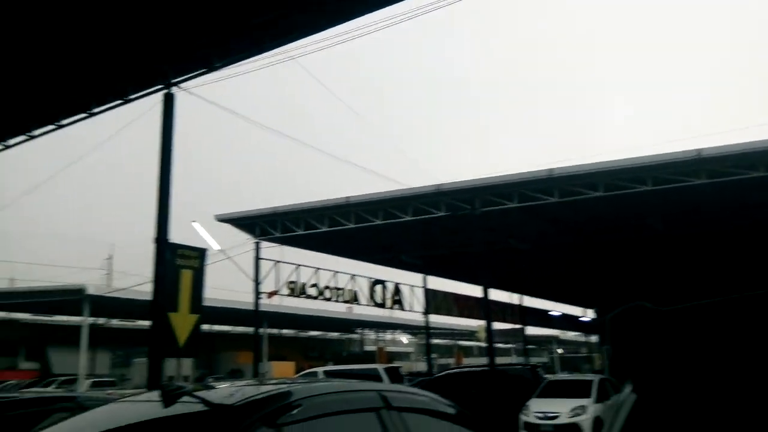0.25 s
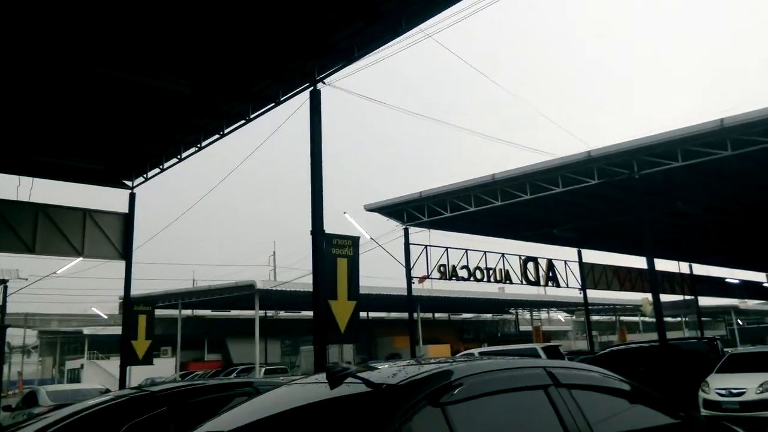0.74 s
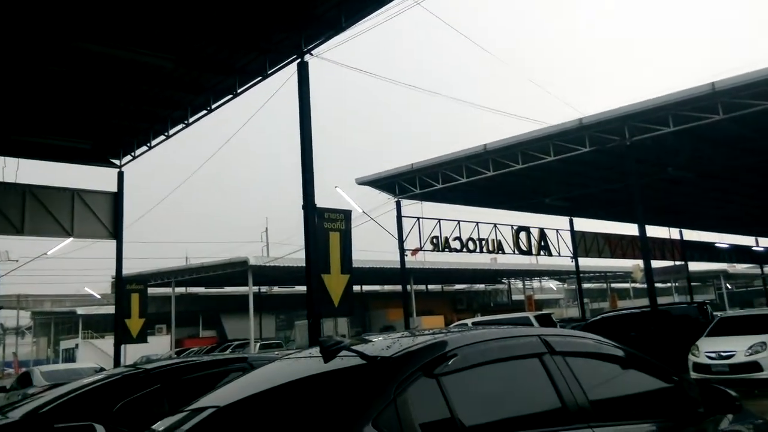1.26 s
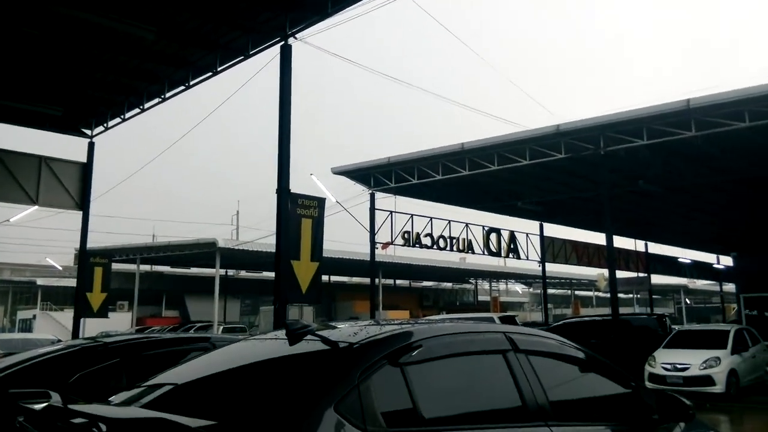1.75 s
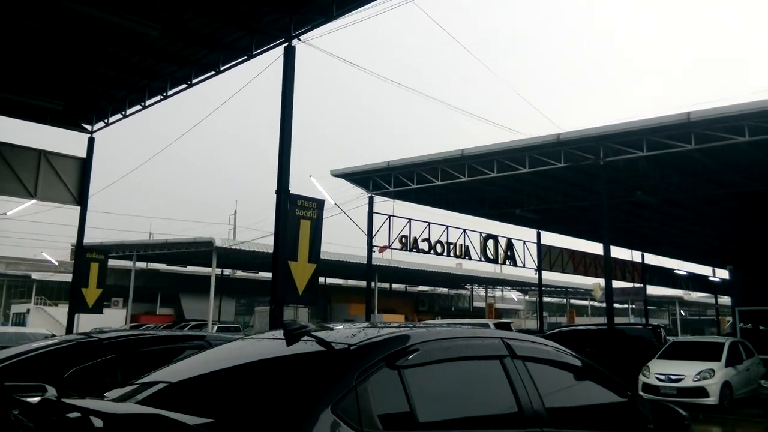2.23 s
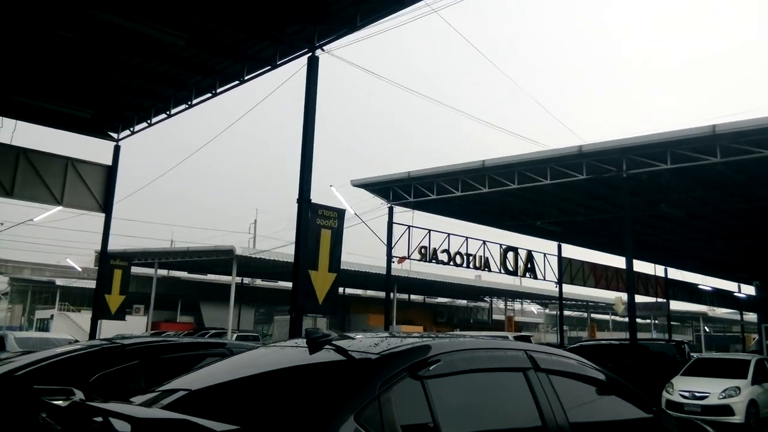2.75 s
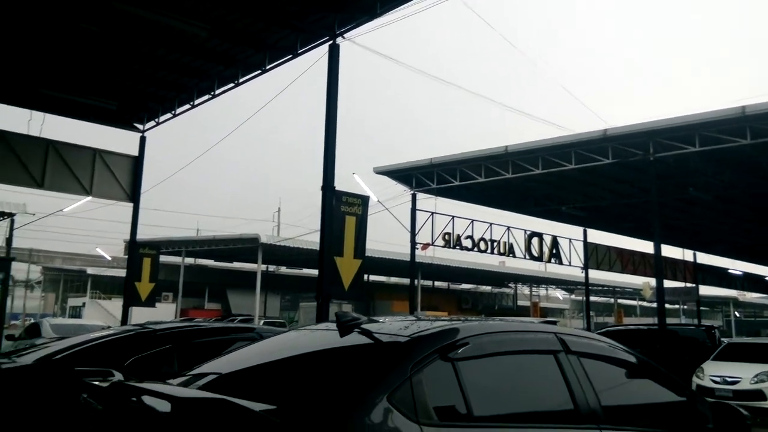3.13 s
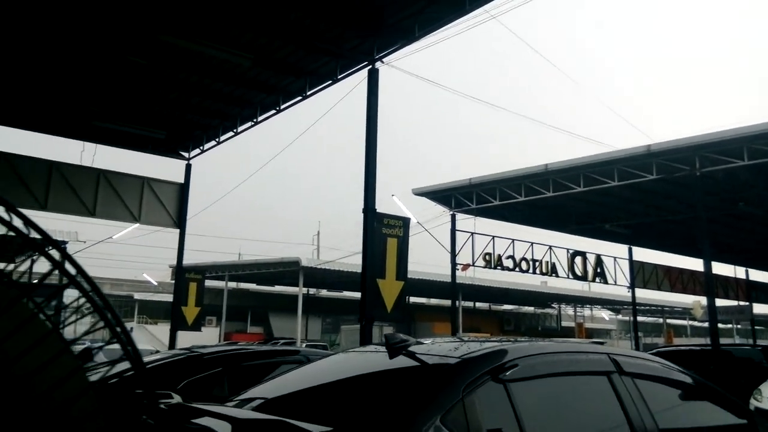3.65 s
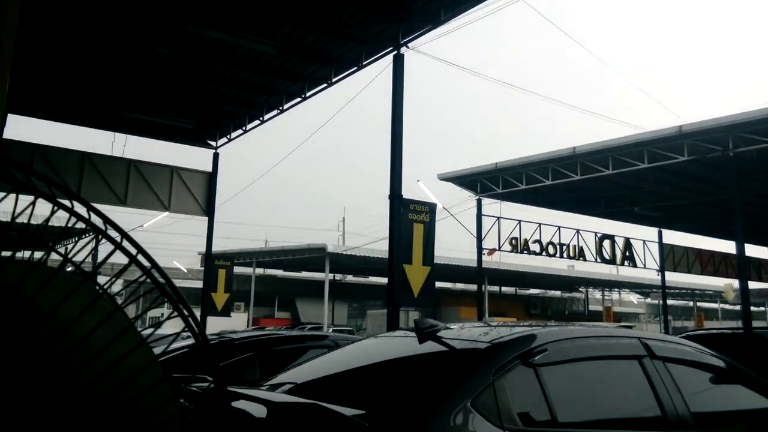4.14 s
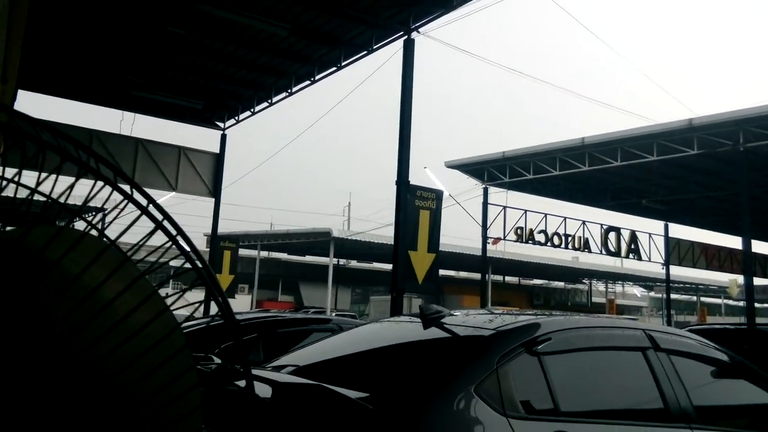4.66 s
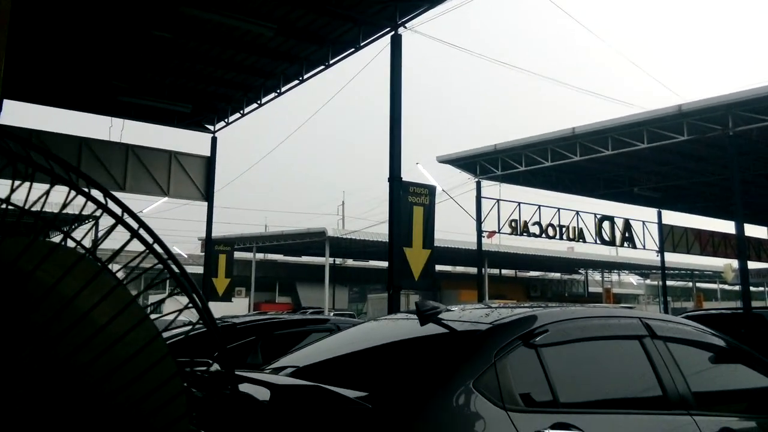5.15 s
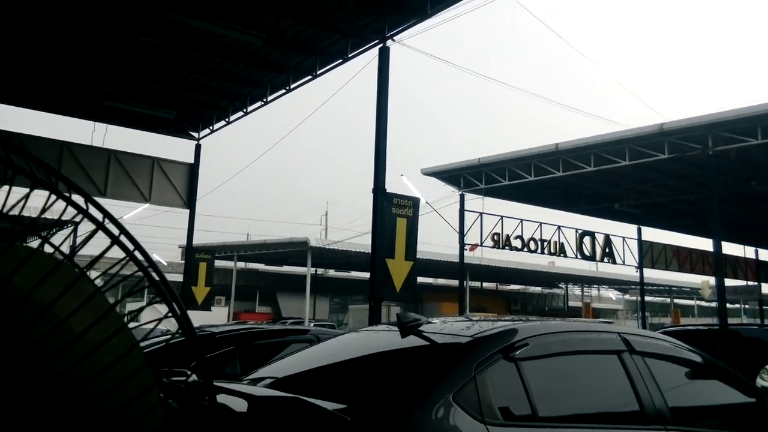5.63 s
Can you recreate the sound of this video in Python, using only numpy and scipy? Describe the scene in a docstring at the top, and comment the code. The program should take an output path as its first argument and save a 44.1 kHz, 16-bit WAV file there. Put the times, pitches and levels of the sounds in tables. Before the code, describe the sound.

A dense, unbroken hiss of heavy rain on a metal carport roof, heard from below with close taps and thin pings.

```python
"""An even roar of heavy rain on the sheet-metal roof of a large open carport, heard from below.
Thousands of drops a second strike the panels, and the space under the roof blurs them together.
Fat drops patter just overhead, thin metal pings, and water splashes on the yard.
The shower eases very slightly. A phone with one microphone picks it all up."""
import sys
import numpy as np
from scipy import signal
from scipy.fft import rfft, irfft
from scipy.io import wavfile
from scipy.ndimage import uniform_filter1d

SR = 44100
rng = np.random.default_rng(int(sys.argv[2]) if len(sys.argv) > 2 else 0)


def master(y):
    """Save y as 16-bit WAV."""
    cut = np.clip(np.atleast_2d(y).T, -1, 1)
    pcm = np.round(cut * 32767)  # scale
    wavfile.write(sys.argv[1], SR, pcm.astype(np.int16))


N = 259736  # length in samples, about 5.9 seconds

# The tone of drops bursting on the wet yard. Each row: frequency in Hz, relative level in dB.
SPLASH_TONE = [(300, -25.5), (1500, -6.5), (3500, -1), (6000, 2), (16000, -7)]
# The bright ring of thin metal. Each row: frequency in Hz, relative level in dB.
PING_TONE = [(3800, -32), (4500, -5), (4850, -1.5), (5200, 0.5), (5500, -14), (6300, -35)]
# The tone of the struck roof. Each row: frequency in Hz, relative level in dB.
ROOF_TONE = [(22, -24.5), (48, -37), (122, -15), (152, -11), (180, -12.5), (245, -8.5), (298, -3),
             (335, -4.5), (480, -4.5), (660, -1.26), (980, 0.93), (1750, -0.16), (2300, -2.5),
             (16000, -7.5)]
# The phone lifts the range near 5 kHz and passes little above. Each row: frequency in Hz, gain in dB.
PHONE_RESPONSE = [(3900, 0.5), (4700, 3.5), (5150, 4), (5600, 0.2), (6100, -4), (6650, -7.5), (6850, -11.5),
                  (7950, -24.5), (9400, -27), (9650, -32), (13900, -35), (14650, -19.5), (15500, -21)]

SHOWER_START_DB, EASING_DB_PER_S = -21.5, 0.2152  # one gain for all the rain
PING_EXTRA_FADE_DB_PER_S = 0.1
PHONE_CUTOFF_HZ = 15480


def gain(db):
    """Turn decibels into a number to multiply the sound by."""
    return 10 ** (np.asarray(db) / 20)


def set_level(sound, db):
    """Scale a sound so that its average (rms) level is db."""
    return sound * gain(db) / np.sqrt(np.mean(sound ** 2))


def shape_tone(sound, curve):
    """Turn each frequency up or down, following a table of Hz and dB."""
    curve_hz, curve_db = np.transpose(curve)
    hz = np.maximum(np.fft.rfftfreq(N, 1 / SR), 1)
    db = np.interp(np.log(hz), np.log(curve_hz), curve_db)
    return irfft(rfft(sound) * gain(db), N)


def split_octaves(sound, count=9):
    """Cut a sound into overlapping octave bands, centred from 60 Hz up, that add up to the whole."""
    hz = np.maximum(np.fft.rfftfreq(N, 1 / SR), 1)
    octave = np.clip(np.log2(hz / 60), 0, count - 1)
    spectrum = rfft(sound)
    return [irfft(spectrum * np.maximum(1 - np.abs(octave - k), 0), N) for k in range(count)]


def waver(per_second):
    """A smooth random wobble that typically strays about 1 from zero."""
    hold = int(SR / per_second)
    steps = np.repeat(rng.standard_normal(N // hold + 2), hold)[rng.integers(hold):]
    ramps = uniform_filter1d(steps, hold)
    return np.sqrt(2) * uniform_filter1d(ramps, hold)[:N]


def drops(per_second, spread_db):
    """One click for each drop, at random moments: many small ones and a few large ones."""
    count = int(per_second * N / SR)
    moment, size, coin_toss = rng.random((count, 3)).T
    force_db = -spread_db * np.log(1 - .99 * size)
    force = gain(force_db) * np.sign(coin_toss - .5)
    return np.bincount((moment * N).astype(int), force, N)


def ring(hits, fade_s):
    """Each hit wakes many close tones that blend into noise and die away by 60 dB in fade_s seconds."""
    decay = np.exp(-2 * np.log(1000) * np.arange(N) / SR / fade_s)
    energy = irfft(rfft(hits ** 2) * rfft(decay / decay.sum()), N)  # the hits' energies add up
    return np.sqrt(np.abs(energy)) * rng.standard_normal(N)


def yard_splashes():
    """Drops burst on the wet ground beyond the roof: tiny sharp ticks in a haze of farther ones."""
    ticks = drops(per_second=2500, spread_db=1.0)
    haze = gain(-5.5) * ring(ticks, fade_s=0.3)
    return set_level(shape_tone(ticks + haze, SPLASH_TONE), db=-7.5)


def metal_pings(seconds):
    """Hard drops make thin metal ping; as the drops soften, this fades faster than the roar."""
    pings = ring(drops(per_second=480, spread_db=1.8), fade_s=0.055)
    softening = gain(-PING_EXTRA_FADE_DB_PER_S * seconds)
    return set_level(shape_tone(pings, PING_TONE) * softening, db=-18.0)


def overhead_taps():
    """Fat drops on the nearest panels reach the listener directly, as short separate taps."""
    taps = ring(drops(per_second=220, spread_db=3.0), fade_s=0.022)
    return set_level(shape_tone(taps, ROOF_TONE), db=-14.0)


def roof_roar():
    """The whole roof rings briefly under countless drops; most of the sound arrives as a blurred echo."""
    panels = ring(drops(per_second=12000, spread_db=2.5), fade_s=0.045)
    echo = ring(panels, fade_s=1.0)
    bands = split_octaves(gain(-6) * panels + echo)
    # The mix of drop sizes keeps shifting, so each octave wavers a little on its own.
    roar = sum(band * gain(0.28 * waver(per_second=6)) for band in bands)
    return set_level(shape_tone(roar, ROOF_TONE), db=-0.53)


def scene():
    """Roof and yard follow one slowly easing shower; left and right carry the same sound."""
    seconds = np.arange(N) / SR
    shower = gain(SHOWER_START_DB - EASING_DB_PER_S * seconds)
    rain = (roof_roar() + overhead_taps() + metal_pings(seconds) + yard_splashes()) * shower
    return np.array([rain, rain])


def record(dry):
    """The phone's microphone changes the tone of the rain and cuts off the highest treble."""
    steep_filter = signal.ellip(N=12, rp=0.1, rs=70, Wn=PHONE_CUTOFF_HZ, fs=SR, output="sos")
    _, treble_cut = signal.sosfreqz(steep_filter, np.fft.rfftfreq(N, 1 / SR), fs=SR)
    picked_up = shape_tone(dry, PHONE_RESPONSE)
    return irfft(rfft(picked_up) * np.abs(treble_cut), N)


dry = scene()
out = record(dry)
master(out)
```